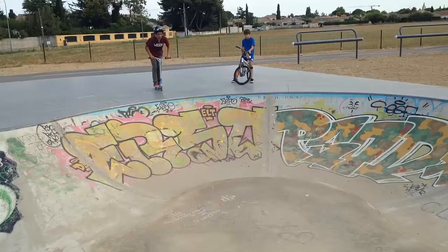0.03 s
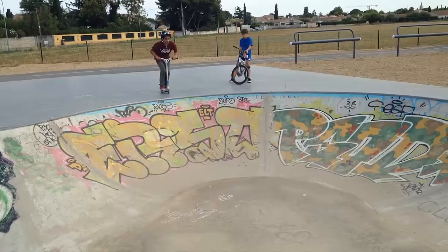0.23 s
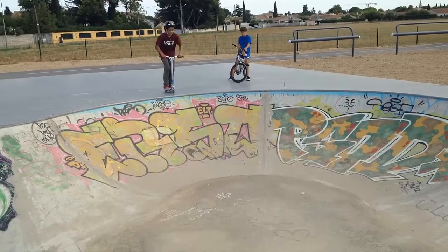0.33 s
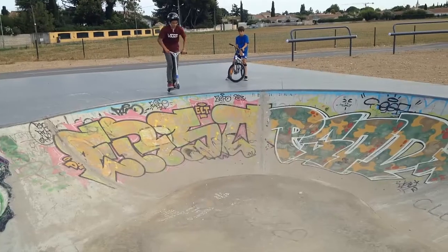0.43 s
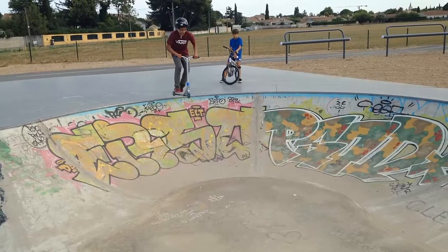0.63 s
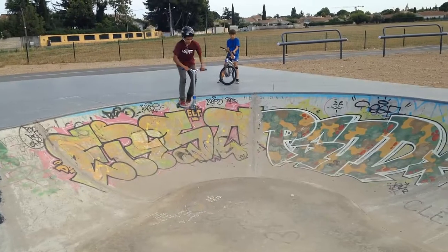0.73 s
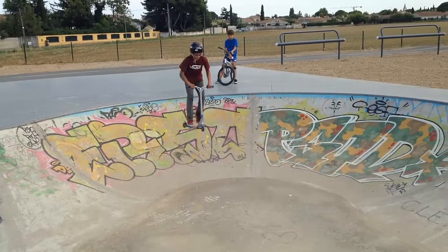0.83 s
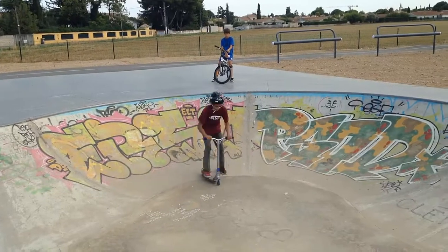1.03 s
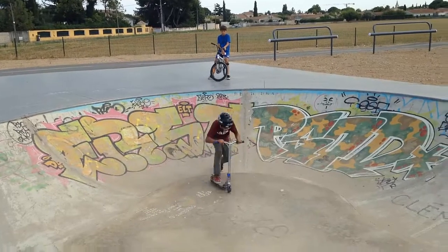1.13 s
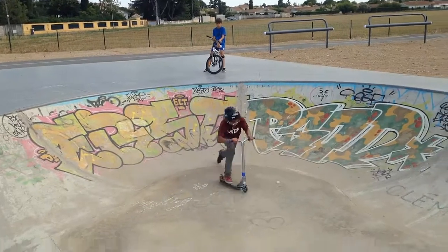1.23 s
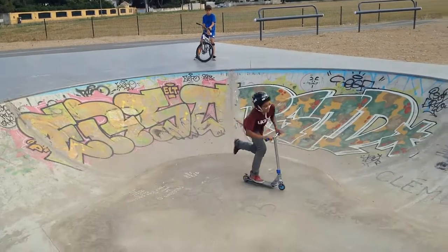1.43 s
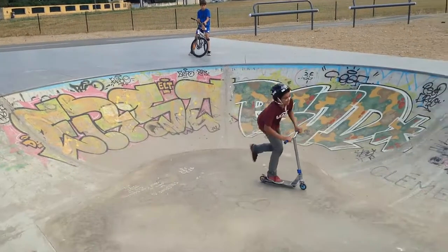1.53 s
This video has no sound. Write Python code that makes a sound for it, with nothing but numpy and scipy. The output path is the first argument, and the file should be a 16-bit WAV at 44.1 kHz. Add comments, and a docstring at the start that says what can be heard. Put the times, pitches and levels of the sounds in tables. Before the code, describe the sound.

Scooter wheels roll, thump and clatter into a concrete bowl after a gust of wind.

```python
"""A concrete bowl, outdoors: a stunt scooter hops in, lands with a thump and clacks across the bottom.
The landing rings its metal bar and sets loose parts jangling; each clack rings the deck.
Its wheels hiss, rumble, growl and knock on the concrete, and their bearings whirr in the air.
Loose parts tick, and the walls scatter every hit back. Gusts of wind buffet the two microphone
ports over a quiet outdoor wash; a short echo, probably from wind-noise suppression, makes them buzz."""
import sys
import numpy as np
from scipy import signal
from scipy.fft import rfft, irfft
from scipy.io import wavfile

SR = 44100
rng = np.random.default_rng(int(sys.argv[2]) if len(sys.argv) > 2 else 0)


def int16_out(signal):
    """Quantize to a 16-bit WAV file."""
    q = np.round(np.clip(np.atleast_2d(signal).T, -1, 1) * 32767)
    wavfile.write(sys.argv[1], SR, q.astype(np.int16))


N = 70560
T = np.arange(N) / SR
HIT_T = T[:N // 3]  # time axis of one hit
HZ = np.fft.rfftfreq(4096, 1 / SR)  # frequency axis of a hit's colour
TREBLE_OCTAVES = np.log2(1 + HZ / 1500)  # axis for tilts: flat in the bass, octaves in the treble


def amp(db):
    """Decibels to gain."""
    return 10 ** (np.asarray(db) / 20)


def unit(x):
    """Scales to rms 1."""
    return x / np.sqrt(np.mean(x ** 2) + 1e-20)


def read(points, hz):
    """Reads a curve on a log-frequency axis."""
    f, value = np.transpose(points)
    return np.interp(np.log(hz + 1), np.log(f + 1), value)


def fader(points, delay_s=0):
    """Gain that rides a curve of t/s, level/dB."""
    return amp(np.interp(T - delay_s, *np.transpose(points)))


def add(mix, s, sound):
    """Mixes a sound in at s seconds."""
    part = mix[round(s * SR):][:len(sound)]
    part += sound[:len(part)]


def coloured(x, colour):
    """EQs a steady sound by a curve of f/Hz, level/dB, and scales it to rms 1."""
    return unit(irfft(rfft(x) * amp(read(colour, np.fft.rfftfreq(N, 1 / SR))), N))


def grains(per_s, spread_db):
    """Random tiny impacts of uneven size."""
    impacts = rng.standard_normal(N) * (rng.random(N) < per_s / SR)
    return impacts * amp(spread_db * np.minimum(rng.exponential(1, N), 4))


def ring(modes, detune):
    """Struck modes: dying sines, slightly detuned on each hit, whose levels set their energy."""
    out = np.zeros(len(HIT_T))
    for hz, db, t60 in modes:
        pitch = hz * (1 + detune * rng.standard_normal())
        energy_trim = np.sqrt(4 * np.log(1000) / (t60 * SR))
        out += energy_trim * amp(db - 60 * HIT_T / t60) * np.sin(2 * np.pi * pitch * HIT_T)
    return out


def blow(colour_db, t60, crack):
    """A crack of contact and a short dense chatter, with energy 1."""
    burst = rng.standard_normal(len(HIT_T)) * amp(-60 * HIT_T / t60)
    burst /= np.linalg.norm(burst)
    burst[0] += crack
    burst[round(.0005 * SR)] -= crack
    # minimum-phase EQ keeps the attack sharp
    log_gain = np.log(amp(np.r_[colour_db, colour_db[-2:0:-1]]))
    response = np.exp(np.conj(signal.hilbert(log_gain)))
    hit = signal.fftconvolve(burst, irfft(response[:len(HZ)]))[:len(HIT_T)]
    return hit / np.linalg.norm(hit)


def landing():
    """A bright crash of several blows rings the metal bar; weaker blows are thinner."""
    # touchdown and the rattle after it: t/s, level/dB, t60/s
    blows = [(1.0865, 10.5, 0.098), (1.0922, 9, 0.021), (1.0995, 3.5, 0.039), (1.1035, -0.5, .04),
             (1.143, -11.5, 0.12), (1.1565, -32, 0.033), (1.1868, -8.5, 0.031), (1.203, -26, 0.03)]
    # crash EQ: f/Hz, level/dB
    colour = [(50, -13), (160, 9.5), (350, 2), (900, 1), (2000, -2.5), (4000, -5.5), (5300, -13),
              (7500, -12.5), (9500, -13), (10500, -6.5), (12500, -17.5), (15000, -19.5)]
    # modes of the bar: f/Hz, level/dB, t60/s
    bar_modes = [(3634, -15, .38), (4460, -16.5, 0.1), (7500, -23, 0.05), (10300, -24, 0.14),
                 (10250, -24, 0.14), (10750, -22, 0.087)]
    bass_cut = 0.42 / (1 + (HZ / 1500) ** 2)  # dB lost for each dB below the first blow
    attack = np.minimum(HIT_T / 0.001, 1)
    out = np.zeros(N)
    for s, db, t60 in blows:
        eq = read(colour, HZ) + bass_cut * (db - blows[0][1])
        hit = blow(eq, t60, crack=0.2) + ring(bar_modes, detune=0.00243)
        add(out, s, amp(db) * attack * hit)
    return out


def thump():
    """The rider's weight comes down on the deck: the soft-edged low end of the landing."""
    # low modes under the load: f/Hz, level/dB, t60/s
    modes = [(158, -0.5, 0.071), (106.3, -3.5, 0.11), (318, -7.5, 0.095), (58, -21, .2)]
    start_s, rise_s, gain_db = 1.088, 0.011, -14.5
    attack = np.minimum(HIT_T / rise_s, 1)
    decay_s = np.maximum(HIT_T - rise_s, 0)
    body = sum(amp(db - 60 * decay_s / t60) * np.sin(2 * np.pi * hz * HIT_T) for hz, db, t60 in modes)
    out = np.zeros(N)
    add(out, start_s, amp(gain_db) * attack * body)
    return out


def clacks():
    """Deck and wheels slap the concrete; each slap has its own colour and rings the deck."""
    # slaps: t/s, level/dB, EQ peak/Hz, treble tilt/(dB per octave), bass shelf/dB, t60/s
    slaps = [(1.2339, -1.5, 2040, -1.5, 8.5, 0.042), (1.2444, -7.5, 4450, -2, -3, 0.014),
             (1.2658, -10.5, 2700, -1.5, 16, 0.052), (1.2815, 9.5, 2350, 2, 0.5, 0.02),
             (1.2865, -0.5, 820, 0.5, 4.5, 0.042), (1.3145, 4, 3200, -7, -32, 0.034),
             (1.3194, -4, 1580, -5.5, -21, 0.07)]
    # base EQ of a slap: f/Hz, level/dB
    colour = [(60, -31), (160, -14), (280, 2), (500, 0.5), (720, 1.5), (1150, 0.5), (1700, 0.5),
              (4200, -2.5), (5100, -11), (6100, -7.5), (7000, -19), (10000, -21), (15000, -53)]
    # modes of the deck: f/Hz, level/dB, t60/s
    deck_modes = [(239, -18, .12), (289, -17, 0.15), (389.4, -21, 0.093), (700.7, -10.5, 0.12),
                  (946, -31, 0.088), (1190, -14.5, 0.055), (1405, -14, 0.11), (1640, -19, 0.095),
                  (1820, -15, 0.09), (2690, -24, 0.11), (3050, -18.5, 0.12), (3645, -19, 0.04)]
    peak_db, peak_octaves, deck_db = 8.5, 0.24, -3
    out = np.zeros(N)
    for s, db, peak_hz, tilt, bass_db, t60 in slaps:
        peak = peak_db * np.exp(-(np.log2((HZ + 1) / peak_hz) / peak_octaves) ** 2)
        shelf = bass_db / (1 + (HZ / 700) ** 2)
        eq = read(colour, HZ) + peak + shelf + tilt * TREBLE_OCTAVES
        hit = blow(eq, t60, crack=0.29) + amp(deck_db) * ring(deck_modes, detune=0.00098)
        add(out, s, amp(db) * hit)
    return out


def knocks():
    """The wheels knock hollowly on the concrete."""
    # wheel hits: t/s, level/dB, t60/s
    hits = [(0.1237, -11, 0.032), (0.1265, -3.5, 0.015), (0.9254, -24.5, 0.05), (1.574, -41, 0.072)]
    # hollow EQ: f/Hz, level/dB
    colour = [(100, -26), (350, -13), (680, 1), (1150, -13), (1550, 2.5), (2000, 2.5), (2500, -23),
              (3500, -22), (6500, -19.5), (8000, -28), (15000, -34.5)]
    out = np.zeros(N)
    for s, db, t60 in hits:
        add(out, s, amp(db) * blow(read(colour, HZ), t60, crack=0.34))
    return out


def ticks():
    """Light rattles of loose parts, some brighter than others."""
    # rattles: t/s, level/dB, t60/s, treble tilt/(dB per octave)
    hits = [(.099, -21.5, 0.045, 0), (.114, -20.5, 0.045, 7), (.154, -17.5, 0.047, 4),
            (.419, -20.5, 0.088, 13), (.485, -21.5, 0.03, 4), (0.614, -28, 0.045, 5),
            (.661, -28.5, 0.045, 11), (.879, -17, 0.068, -3), (.924, -22.5, 0.072, -0.5),
            (1.0665, -11.5, 0.073, -1), (1.158, -8, .03, 6), (1.332, -11.5, 0.04, -5.5),
            (1.362, -19.5, 0.069, -2.5), (1.474, -22, 0.035, -3), (1.574, -24, .05, -4)]
    # base EQ of a tick: f/Hz, level/dB
    colour = [(100, -20), (600, 3), (1500, 9), (2500, -1), (4500, 8.5), (8000, -6), (11000, -12.5),
              (15000, -23)]
    out = np.zeros(N)
    for s, db, t60, tilt in hits:
        eq = read(colour, HZ) + tilt * TREBLE_OCTAVES
        add(out, s, amp(db) * blow(eq, t60, crack=.1))
    return out


def jangle():
    """Loose metal chatters densely after the landing."""
    # chatter envelope: t/s, level/dB
    envelope = [(1.085, -90), (1.1, -50), (1.13, -44), (1.155, -36.5), (1.18, -50), (1.192, -44),
                (1.21, -53), (1.24, -81), (1.3, -83)]
    # metallic peaks: f/Hz, level/dB
    colour = [(300, -17), (1200, -2), (3200, -10), (3650, 16), (4100, -3.5), (4700, 2), (6200, 1),
              (9500, -15), (10400, 7), (11500, -19), (15000, -11)]
    return coloured(grains(per_s=5000, spread_db=1.0), colour) * fader(envelope)


def roll():
    """Wheels roll on concrete: grit crackles over a smooth hiss."""
    # rolling envelope: t/s, level/dB
    envelope = [(.07, -51), (.14, -46), (.2, -59.5), (.88, -57.5), (.93, -47), (.97, -58.5), (1.08, -49),
                (1.13, -45.5), (1.22, -45), (1.33, -46.5), (1.39, -57.5), (1.43, -48), (1.48, -50),
                (1.55, -52.5), (1.6, -47)]
    # tone of the concrete: f/Hz, level/dB
    colour = [(80, 3), (300, 11.5), (1000, -0.5), (2800, -1.5), (5000, -9.5), (9000, -19.5), (15000, -23)]
    grit_share = .45
    grit = unit(grains(per_s=2500, spread_db=2.5))
    texture = grit_share * grit + (1 - grit_share) * rng.standard_normal(N)
    return coloured(texture, colour) * fader(envelope)


def rumble(width=0.18):
    """Wheels and air make a low rumble, slightly spread in stereo."""
    # rumble swells: t/s, level/dB
    envelope = [(.07, -57.5), (.5, -54.5), (.75, -58), (.86, -53), (.94, -41), (1.0, -55.5), (1.13, -45),
                (1.22, -54), (1.34, -56), (1.45, -49.5), (1.5, -38.5), (1.55, -55), (1.6, -43)]
    # bass-heavy EQ: f/Hz, level/dB
    colour = [(20, -34), (40, -10), (60, -6.5), (105, 3), (170, -16), (300, -22), (1000, -62)]
    mid, side = coloured(rng.standard_normal((2, N)), colour)
    return (mid + width * np.array([side, -side])) * fader(envelope)


def growl():
    """Loaded wheels drum down the rough wall of the bowl."""
    # growl surges: t/s, level/dB
    envelope = [(.8, -77), (.9, -66), (.93, -41), (.98, -56), (1.03, -39), (1.08, -39.5), (1.15, -46),
                (1.22, -72), (1.3, -54), (1.37, -81), (1.55, -77), (1.6, -52)]
    # low-mid body: f/Hz, level/dB
    colour = [(100, -20), (300, 2), (500, 1), (900, -1.5), (1500, -11.5), (2500, -23), (6000, -46)]
    return coloured(grains(per_s=2500, spread_db=4.5), colour) * fader(envelope)


def spin():
    """Bearings whirr faintly as the wheels spin in the air, pulsing with each turn."""
    # whirr envelope: t/s, level/dB
    envelope = [(.4, -74), (.54, -56), (.63, -63), (.74, -50.5), (.86, -64), (1.05, -71)]
    # thin, bright bearing tone: f/Hz, level/dB
    colour = [(500, -21), (2500, -1.5), (3700, -0.5), (4400, 4), (5000, -0.5), (6700, -6), (7500, -5.5),
              (8500, -12), (9700, -11), (10400, -6.5), (11500, -14), (15000, -20)]
    turn_hz, depth_db = 22.73, 3
    pulse = amp(depth_db * np.sin(2 * np.pi * turn_hz * T))
    return coloured(rng.standard_normal(N), colour) * fader(envelope) * pulse


def wind():
    """Wind buffets the microphone ports; a 20 ms processing echo leaves a buzz after each gust."""
    # gusts: t/s, level/dB
    envelope = [(.07, -92), (.16, -43), (.2, -31), (.235, -21), (.26, -17), (.315, -14.5), (.35, -19),
                (.41, -21.5), (.435, -38.5), (.47, -81), (.53, -57.5), (.81, -62), (.84, -43.5), (.88, -63),
                (1.0, -30.5), (1.07, -37.5), (1.16, -37), (1.23, -95), (1.555, -112), (1.585, -39.5)]
    # buffeting EQ: f/Hz, level/dB
    colour = [(40, -42), (110, -32), (190, -4.5), (300, 0.5), (390, -0.5), (500, -7), (750, -10.5),
              (1400, -17), (2500, -32.5), (4500, -46.5), (9000, -81)]
    crossover_hz, treble_lag_s, brighten = 603, 0.025, 0.59
    bleed_gain, bleed_top_hz = 0.15, 310
    echo_hz, feedback, echo_top_hz = 49.4, .64, 970
    hz = np.fft.rfftfreq(N, 1 / SR)
    air = coloured(rng.standard_normal((2, N)), colour)
    low = irfft(rfft(air) / (1 + (hz / crossover_hz) ** 4), N)
    # each port shares a little of the other's bass
    bleed = irfft(rfft(low[::-1]) * bleed_gain / (1 + (hz / bleed_top_hz) ** 4), N)
    late = fader(envelope, treble_lag_s)
    treble = (air - low) * late * (late / late.max()) ** brighten  # stronger gusts are brighter
    gusts = (low + bleed) * fader(envelope) + treble
    # the echo, probably from wind-noise suppression, is duller on each repeat
    padded_hz = np.fft.rfftfreq(2 * N, 1 / SR)
    delay = np.exp(-2j * np.pi * padded_hz / echo_hz)
    repeat = feedback * delay / (1 + (padded_hz / echo_top_hz) ** 2)
    return irfft(rfft(gusts, 2 * N) / (1 - repeat))[:, :N]


def bowl(hits):
    """Short scattered reflections from the concrete walls."""
    # reverb time: f/Hz, t60/s
    decay = [(100, 0.52), (500, 0.56), (1500, 0.89), (4000, 0.45), (12000, 0.45)]
    wet_db, predelay_s = -21, .008
    hz, t, noise = signal.stft(rng.standard_normal(SR // 2), SR, nperseg=256)
    fade = amp(-60 * t / read(decay, hz)[:, None])
    tail = signal.istft(noise * fade, SR, nperseg=256)[1]
    response = np.r_[np.zeros(round(predelay_s * SR)), tail / np.linalg.norm(tail)]
    return amp(wet_db) * signal.fftconvolve(hits, response)[:N]


def outdoors(width=0.12):
    """A faint distant wash of open air, narrowing to mono in the treble."""
    # ambience bed: t/s, level/dB
    envelope = [(.07, -54), (.3, -50.5), (.55, -51), (.75, -53.5), (1.0, -54.5), (1.4, -67), (1.6, -67)]
    # soft midrange EQ: f/Hz, level/dB
    colour = [(90, -58), (180, -8), (330, -0.5), (600, 0.5), (1200, 0.5), (2600, -8.5), (4500, -15),
              (8000, -20), (15000, -29.5)]
    mid, side = coloured(rng.standard_normal((2, N)), colour)
    side = signal.sosfilt(signal.butter(2, 1800, fs=SR, output="sos"), side)
    return (mid + width * np.array([side, -side])) * fader(envelope)


def scene():
    """The scooter straight ahead, with wind and open air around it; only the hits feed the reverb."""
    hits = clacks() + landing() + thump() + ticks() + knocks()
    scooter = hits + bowl(hits) + jangle() + roll() + rumble() + growl() + spin()
    return scooter + wind() + outdoors()


def record(dry):
    """The sound opens after a moment of silence and passes a steep high cut."""
    start_s, high_cut_hz = .072, 15400
    lowpass = signal.firwin(255, high_cut_hz, window=("kaiser", 9), fs=SR)
    return signal.oaconvolve(dry * (T >= start_s), lowpass[None], "same")


dry = scene()
out = record(dry)
int16_out(out)
```